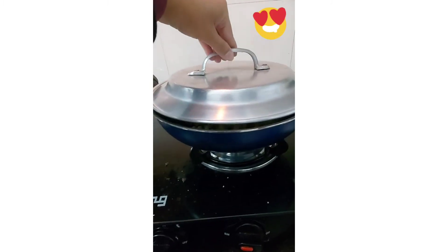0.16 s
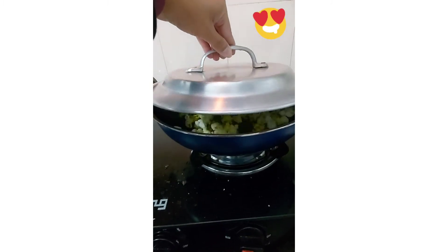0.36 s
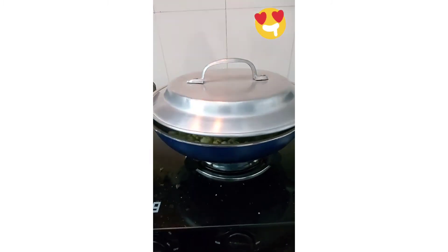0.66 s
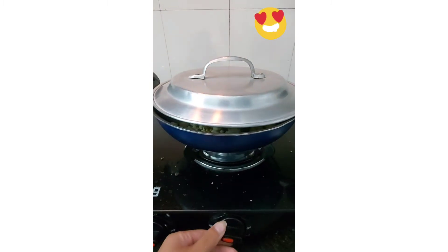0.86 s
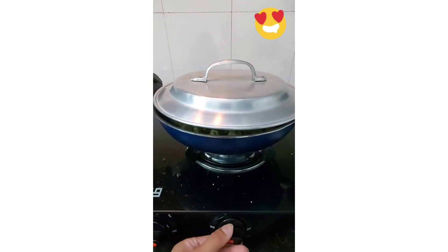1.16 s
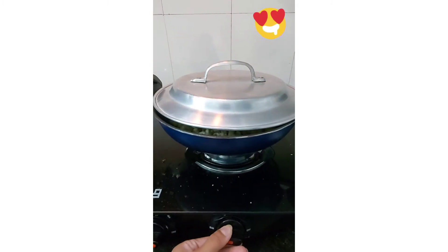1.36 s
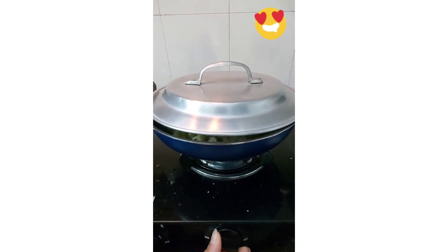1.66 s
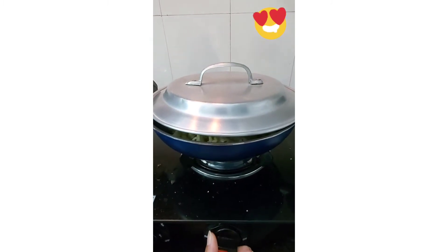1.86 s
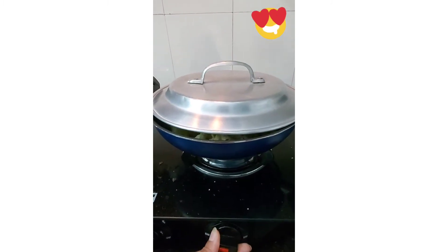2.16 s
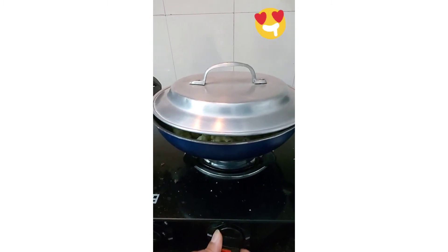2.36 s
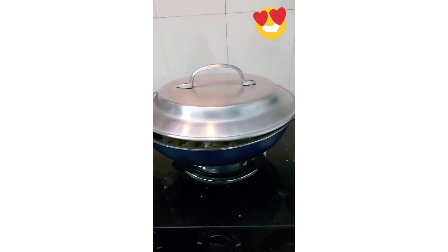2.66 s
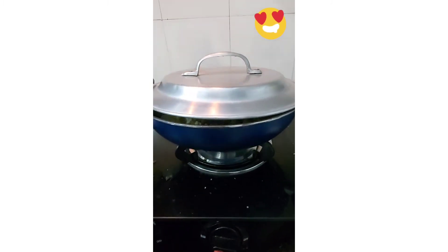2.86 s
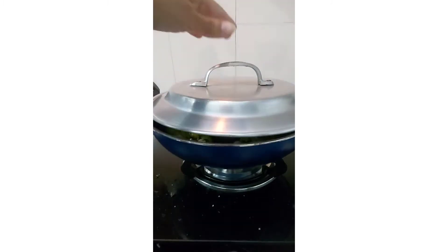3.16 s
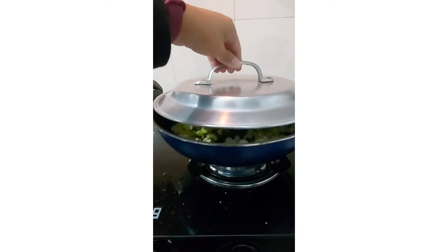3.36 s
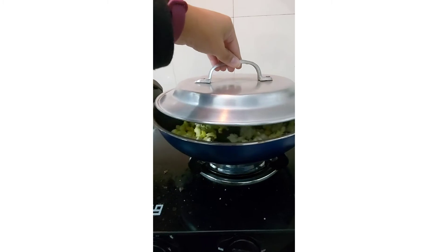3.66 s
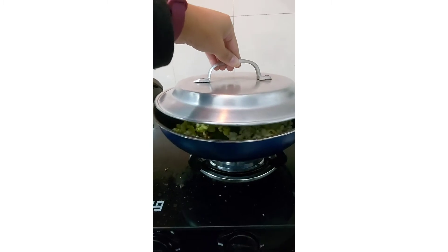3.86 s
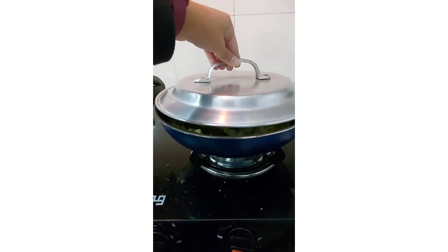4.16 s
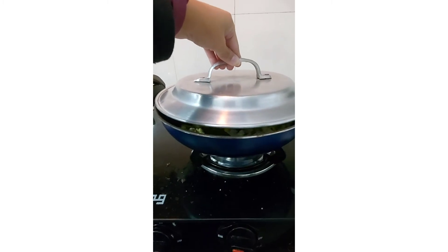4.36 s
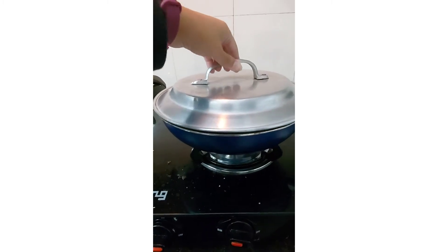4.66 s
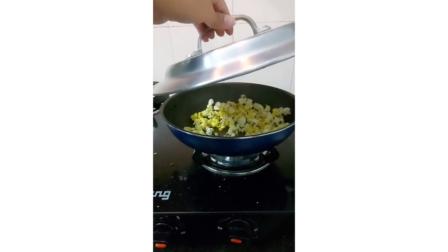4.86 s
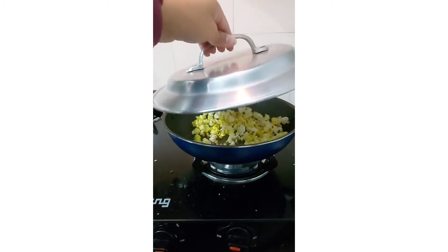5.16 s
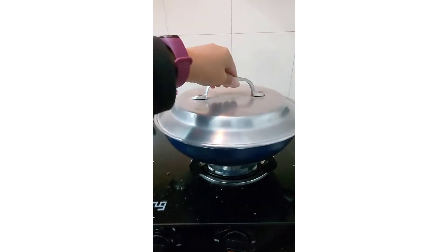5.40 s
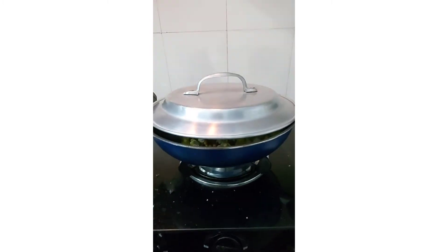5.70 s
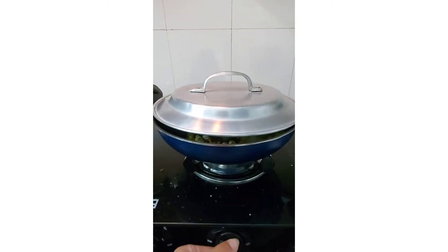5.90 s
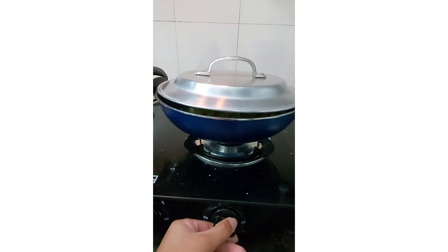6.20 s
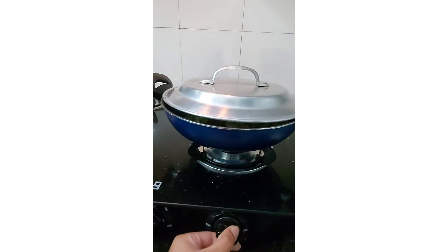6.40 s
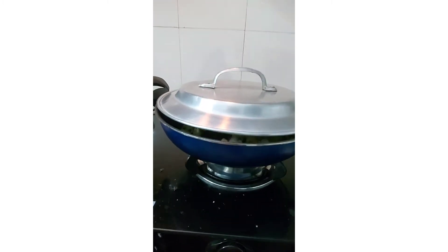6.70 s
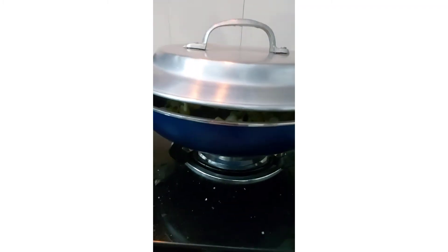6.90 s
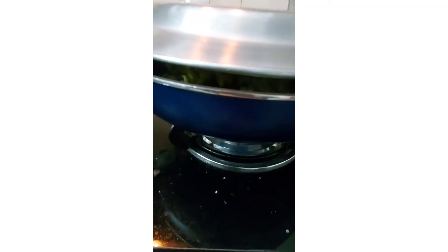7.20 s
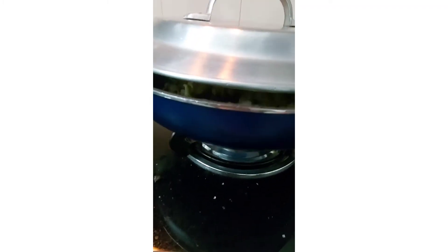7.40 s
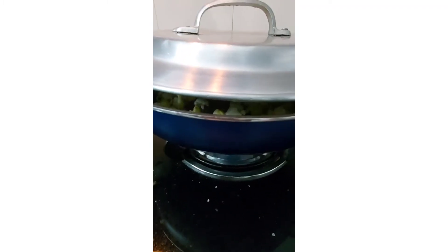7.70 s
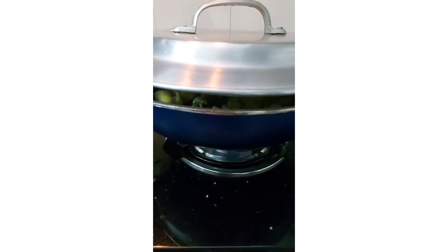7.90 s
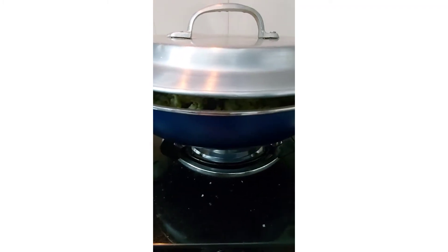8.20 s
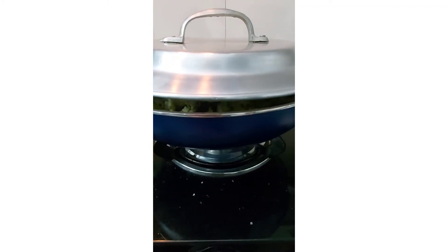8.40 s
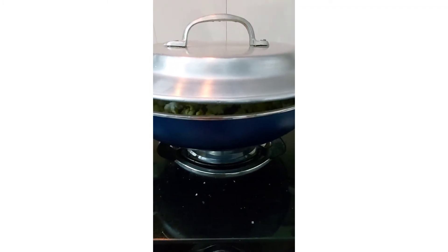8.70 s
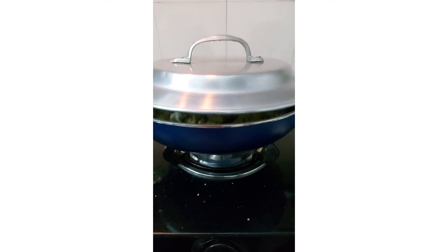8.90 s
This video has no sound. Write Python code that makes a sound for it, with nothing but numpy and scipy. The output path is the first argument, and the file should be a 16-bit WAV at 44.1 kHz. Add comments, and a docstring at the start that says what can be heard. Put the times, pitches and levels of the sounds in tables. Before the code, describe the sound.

Popcorn pops close by in a lidded metal pan on a kitchen gas stove. Each pop is a sharp crack with a hollow thump and a short metallic ring, and popped corn tumbles lightly in between. The pops come in quick, uneven clusters, then thin out. A faint burner hiss, tiny oil spits and a low street drone lie underneath, and a car horn sounds briefly outside at the end.

```python
"""Popcorn pops under a loose metal lid on a gas stove, close to a phone with two microphones.
Each pop thumps the air under the lid, rings the pan and cracks; popped corn tumbles in between.
Behind it the kitchen rumbles, the burner hisses and the street drones, louder as traffic draws near.
Oil spits, faint tones come and go, and at the end a car horn buzzes outside."""
import sys
import numpy as np
from scipy import signal
from scipy.io import wavfile
from scipy.ndimage import uniform_filter1d

SR = 44100
rng = np.random.default_rng(int(sys.argv[2]) if len(sys.argv) > 2 else 0)


def dump_mix(stems):
    """Bounce the given channels to the path in sys.argv[1] as a 16-bit WAV at rate SR."""
    frames = np.atleast_2d(stems).T  # one column per channel
    limited = np.clip(frames, -1, 1)  # hard clip at full scale
    pcm = np.round(limited * 32767).astype(np.int16)
    wavfile.write(sys.argv[1], SR, pcm)


N = 399100


def undb(db):
    return 10 ** (np.asarray(db) / 20)


def level(x, db):
    return x * undb(db) / np.sqrt(np.mean(x ** 2))


def crest(x, db, ms):
    """Scale a sound so that its loudest stretch, ms long, has this level."""
    power = uniform_filter1d(np.mean(x ** 2, axis=0), int(ms * SR / 1000))
    return x * undb(db) / np.sqrt(power.max())


def band(x, low_hz, high_hz):
    return signal.sosfilt(signal.butter(2, [low_hz, high_hz], "band", fs=SR, output="sos"), x)


def smooth(x, samples):
    return uniform_filter1d(uniform_filter1d(x, samples), samples)


def wander(per_s):
    """A smooth random wobble, mostly between -1 and 1."""
    hold = int(SR / per_s)
    return 1.3 * smooth(np.repeat(rng.standard_normal(N // hold + 1), hold), hold)[:N]


def curve(table):
    return np.interp(np.arange(N) / SR, *np.transpose(table))


def add(out, sound, start_s):
    at = int(start_s * SR)
    out[:, at:at + sound.shape[1]] += sound[:, :N - at]


def ring(tones, gain_db, phase):
    """One tap sets tones ringing; each drops 60 dB in its fade_s."""
    hz, db, fade_s = np.transpose(tones)
    waves = np.exp(np.outer(2j * np.pi * hz - np.log(1000) / fade_s, np.arange(3072) / SR))
    return np.imag((undb(db + gain_db) * np.exp(1j * phase)) @ waves)


def detune(tones, share):
    return np.array(tones) * (1 + share * rng.standard_normal((len(tones), 1)) * [1, 0, 0])


def drive(ringing, taps):
    return signal.fftconvolve(ringing, taps[None], axes=1)[:, :len(taps)]


# Natural tones of the air under the lid: pitch_hz, relative_db, fade_s
AIR_TONES = [(184.5, 0, 0.063), (306.4, -17.5, 0.65), (336.8, 1.5, 0.17), (392.9, 7.5, 0.093),
             (513, -5, 0.079)]
AIR_DETUNE = 0.044  # share of the pitch, from hit to hit

def air_thump(t, swell, fall, taps, air_hz):
    """The air under the lid gives a low thump that reaches both microphones nearly in step."""
    lag = np.array([[0], [.4]])
    tone = swell * undb(-10.5 * fall) * np.sin(2 * np.pi * air_hz * t + lag)
    air = ring(detune(AIR_TONES, AIR_DETUNE), rng.standard_normal(len(AIR_TONES)), lag)
    air = crest(drive(air, taps * swell * undb(-30 * fall)), -2.5, ms=6.8)
    return band(band(tone + air, 0.47 * air_hz, 1.29 * air_hz), 213, 770)


# Natural tones of the pan and lid: pitch_hz, relative_db, fade_s
PAN_TONES = [(651, -6, 0.11), (884, -1.5, 0.097), (1229, -8, 0.29), (1633, -9.5, 0.28), (1904, -3.5, 0.1),
             (2200, -0.5, 0.097), (2480, -5.5, 0.13), (2967, -4, 0.1), (3226, -5.5, 0.031),
             (3740, 3.5, 0.065), (4275, 3.5, 0.07), (4800, -6, 0.062), (5490, 3, 0.08)]

def pan_ring(t, swell, fall, taps, rise_ms, fall_ms, crack_over_ring_db, main_hz, second_hz):
    """Corn rings and rattles the metal; the spot it strikes brings out two tones."""
    pan_hz = np.array(PAN_TONES)[:, 0]
    nearby_db = 5.2 * np.exp(-(np.log(pan_hz / main_hz) / 0.3) ** 2)
    random_db = 3.5 * rng.standard_normal(len(pan_hz))
    # slow hits, and knocks with little crack, sound duller
    db_per_octave = -.25 * rise_ms + 0.51 * min(crack_over_ring_db - 4.5, 0)
    dull_db = db_per_octave * np.log2(pan_hz / 1800).clip(0)
    tones = detune(PAN_TONES, share=0.015)  # heat and corn shift the pitches
    metal = ring(tones, nearby_db + random_db + dull_db, 2 * np.pi * rng.random((2, len(tones))))
    lag = np.array([[0], [np.pi / 2]])  # the microphones hear the metal out of step
    metal += ring([(main_hz, 8, 0.089), (second_hz, 6.5, 0.089)], -.3 * rise_ms, lag * [1, -1])
    metal = crest(drive(metal, taps[1] * swell * undb(-18 * fall)), 0, ms=0.77)
    rattle = band(taps[1:] * swell * undb(-7 * fall), 960, 3660)
    rattle = crest(rattle, -5.5 + min(0.16 * rise_ms, 3), ms=1)
    # a sharp blow adds a clear ping
    sharpness = 1.31 * np.exp(-rise_ms / 7 - (fall_ms / 36) ** 2)
    ping = np.sin(2 * np.pi * main_hz * t + lag) + undb(-1.5) * np.sin(2 * np.pi * second_hz * t - lag)
    ping *= swell * undb(-6 * fall - 0.52 * np.maximum(1000 * t - rise_ms, 0))
    return metal + rattle + sharpness * ping


def hull_crack(t, swell, fall, cut_short, crack_db):
    """A gritty crack drops fast and trails off as steam; a loud one is a hull bursting at once."""
    grit = undb(2.77 * rng.exponential(size=len(t)))
    burst = np.clip((crack_db + 29) / 4, 0, 1)  # bursts begin above -29 dB
    attack = swell + burst * (1 - swell)
    fade = 0.4 * burst * np.exp(-t / 0.0036) + undb(-16 * fall) + 0.024 * undb(-4 * fall) * cut_short
    spray = rng.standard_normal((4, len(t))) * grit * attack * fade
    lower = np.array([[.9], [1.1]]) * band(spray[:2], 4160, 8270)
    upper = np.array([[1.1], [.45]]) * band(spray[2:], 8300, 13900)  # louder on the left
    return lower + upper


def corn_hit(air_hz, rise_ms, fall_ms, thump_db, ring_db, crack_db, main_hz, second_hz):
    """One pop or tumble: a swarm of tiny taps swells and dies, with a thump, a ring and a crack."""
    t = np.arange(6144) / SR
    ms = 1000 * t
    swell = np.clip(ms / rise_ms, 0, 1) ** 0.71
    fall = np.maximum(ms - rise_ms, 0) / max(fall_ms, 4)  # fading steps since the peak
    taps = rng.standard_normal((3, len(t))) * undb(2.2 * rng.exponential(size=(3, len(t))))
    # the ring is cut off quickly, leaving a faint tail
    cut_short = undb(-3 * fall ** 2) + 0.12 * np.exp(-ms / 50)
    thump = air_thump(t, swell, fall, taps[0], air_hz)
    thump = crest(thump * cut_short, thump_db, ms=12.9) * undb([[-.8], [.8]])
    metal = pan_ring(t, swell, fall, taps, rise_ms, fall_ms, crack_db - ring_db, main_hz, second_hz)
    crack = hull_crack(t, swell, fall, cut_short, crack_db)
    return thump + crest(metal * cut_short, ring_db, ms=5.2) + crest(crack, crack_db, ms=1.44)


def stove_shake(hz, db):
    """The stove top gives a short, deep shudder, stronger on the left."""
    t = np.arange(6000) / SR
    wave = np.array([[1.4], [.6]]) * np.sin(2 * np.pi * hz * t - np.array([[0], [1.2]]))
    return undb(db) * wave * np.exp(-t / 0.007) * np.clip(t * hz * 4, 0, 1)


def steam(db):
    """Steam hisses on after a crack."""
    t = np.arange(13000) / SR
    return undb(db) * band(rng.standard_normal((2, len(t))), 5500, 15500) * np.exp(-t / 0.13)


# Pops, knocks and tumbles of the corn (fall_ms is one step of fading):
# start_s, rise_ms, fall_ms, thump_db, ring_db, crack_db, main_pitch_hz, second_pitch_hz
CORN_HITS = [(0.006, 4.7, 24, -19.5, -30.5, -32, 3760, 810), (0.142, 15, 16, -24, -31, -40, 1830, 2320),
             (0.188, 15.2, 18, -32, -32.5, -40, 1580, 3300), (0.305, 3.6, 41, -33, -30, -37, 680, 910),
             (0.317, 3.5, 3.4, -17.5, -24, -17.5, 650, 1930),
             (0.372, 20.3, 11.8, -15, -19.5, -35, 1890, 1670),
             (0.448, 8.5, 14, -27, -27, -26.5, 2230, 3720), (0.488, 14.6, 60, -34, -30.5, -34, 2510, 925),
             (0.548, 2.9, 11, -35, -35.5, -38, 896, 2350), (0.581, 9.3, 38, -22.5, -29, -30, 1135, 830),
             (0.603, 1.1, 14, -30, -23, -20.5, 897, 4258), (0.616, 4.9, 12.6, -25, -28, -30, 903, 1660),
             (0.769, 6.2, 31, -32.5, -34.5, -49, 880, 1970), (0.802, 0.67, 19, -9, -25, -24.5, 640, 884),
             (0.862, 13.3, 18, -25.5, -25, -42, 1878, 2410),
             (0.9, 28.4, 16.2, -31, -27.5, -37.5, 880, 2995), (1.15, 1.4, 18, -24, -29, -19, 3950, 4300),
             (1.172, 3.9, 19.5, -29.5, -28, -64, 887, 1312), (1.3, 15, 23, -26.5, -37, -34.5, 3100, 5023),
             (1.371, 11, 31, -24, -34.5, -45, 890, 780), (1.419, 11.3, 20.4, -26.5, -31, -28.5, 2260, 4030),
             (1.462, 13.5, 22, -23.5, -28.5, -44, 1390, 896),
             (1.606, 7.3, 18.6, -18.5, -28, -28.5, 1110, 2560),
             (1.634, 8.9, 11, -55, -29.5, -50, 2050, 1386), (1.662, 1.8, 15, -16.5, -32, -25, 1210, 1820),
             (1.675, 1.9, 29, -33, -27, -51, 924, 2430), (1.909, 7.1, 43, -72, -44.5, -60, 2175, 2505),
             (2.07, 11.2, 28.4, -30.5, -25.5, -26.5, 3042, 880),
             (2.279, 12.2, 21, -30.5, -32, -43.5, 1280, 1520), (2.327, 9.8, 25, -47, -43, -50.5, 633, 3740),
             (2.38, 4.2, 21.5, -19.5, -26.5, -23, 820, 3600),
             (2.401, 8.6, 19.6, -34.5, -30.5, -60, 2110, 900),
             (2.518, 2.3, 21.4, -20.5, -24, -20, 833, 2200),
             (2.602, 7.8, 36.6, -24.5, -28, -43.5, 2010, 1553),
             (2.673, 2.6, 9.2, -29.5, -41.5, -50, 1550, 730),
             (2.836, 2.7, 44, -33.5, -30, -25.5, 3750, 2210),
             (2.869, 0.74, 15.3, -13, -14.5, -19, 2940, 3920),
             (3.037, 1.1, 6.5, -19.5, -24, -19, 2850, 3440),
             (3.05, 5.8, 13.5, -17.5, -26.5, -19.5, 3040, 2590),
             (3.067, 2.9, 5, -49, -27, -29.5, 3100, 910), (3.226, 23, 11, -30, -36, -43, 630, 1633),
             (3.322, 14, 19, -30, -28, -43, 1640, 2430), (3.496, 31, 7.4, -41.5, -49, -59, 890, 2180),
             (3.578, 15.8, 22, -32.5, -24.5, -28.5, 1950, 665),
             (3.646, 9.3, 37, -37.5, -39, -52, 634, 1280), (3.716, 17.8, 19, -41.5, -32, -30, 2976, 1620),
             (3.862, 8, 20, -66, -55.5, -58, 2540, 3320), (4.012, 8.1, 44, -54, -49, -78, 900, 2220),
             (4.091, 1.2, 30, -18, -26, -27, 2480, 4720), (4.099, 4.1, 14, -21.5, -15.5, -21.5, 2413, 1950),
             (4.423, 3.9, 11.6, -15.5, -23.5, -19, 3630, 2880), (4.443, 7.9, 17, -45, -30, -61, 2048, 1560),
             (4.511, 4.3, 23, -35, -34, -38, 1986, 1610), (4.653, 78, 8.4, -48, -53.5, -44.5, 885, 1880),
             (5.015, 23.4, 13, -45.5, -35, -32.5, 3170, 2010),
             (5.259, 3.6, 11, -19.5, -21.5, -31, 1830, 526), (5.285, 3.9, 9, -17, -24.5, -70, 1800, 1210),
             (5.287, 2, 14, -34, -19, -70, 525, 650), (5.351, 18, 45, -30, -40, -50, 640, 2190),
             (5.391, 3.5, 39, -30, -36, -75, 1365, 2020), (5.42, 32, 11, -34.5, -47.5, -49, 2680, 2090),
             (5.623, 11, 57, -74, -39, -59, 2660, 2270), (5.813, 7.3, 16.5, -15, -20, -23, 884, 2170),
             (5.941, 5.4, 5.5, -38.5, -41, -40, 780, 2190), (6.158, 10, 23.4, -30, -35, -39, 1205, 1910),
             (6.205, 1.9, 32, -20, -30, -30.5, 1950, 2700), (6.306, 1.8, 13.4, -14.5, -24, -19, 2545, 4220),
             (6.322, 0.91, 19, -33, -32, -54, 1944, 1240),
             (6.632, 0.45, 15.2, -18.5, -16.5, -11.5, 2206, 2930),
             (7.004, 0.37, 12, -22, -20, -15.5, 2215, 2990), (7.247, 25.5, 3.7, -37, -26.5, -36, 920, 2380),
             (7.259, 4.8, 5.6, -17.5, -23.5, -20.5, 830, 4790),
             (7.274, 0.84, 24, -52, -27.5, -76, 1230, 1930), (7.456, 17, 17, -45.5, -52, -52, 684, 3070),
             (7.835, 2, 25, -24, -33, -31.5, 2960, 2070),
             (7.872, 10.5, 38.4, -34.5, -31, -32.5, 1240, 4312),
             (8.488, 1.5, 17.6, -23.5, -27, -19, 1233, 2990), (8.506, 1.8, 30, -34, -29, -43, 1750, 1336),
             (8.554, 7.3, 14.6, -18.5, -18, -35.5, 1732, 875)]
# The thump, tuned by the gap under the lid and the heap of corn: time_s, pitch_hz
THUMP_PITCH = [(0, 376.5), (3.2, 356.7), (3.35, 468), (4.15, 428), (4.4, 356.3), (5.0, 505), (5.26, 474),
               (5.3, 378), (5.8, 380), (7.0, 360), (7.3, 343), (7.85, 322), (8.5, 361)]

def popcorn():
    """Each hit sounds in the pan, shakes the stove a little and leaves a wisp of steam."""
    out = np.zeros((2, N))
    for start_s, *hit in CORN_HITS:
        rise_ms, _, thump_db, _, crack_db, _, _ = hit
        air_shift, shake_shift = rng.standard_normal(2)
        air_hz = np.interp(start_s, *np.transpose(THUMP_PITCH)) * (1 + AIR_DETUNE * air_shift)
        add(out, corn_hit(air_hz, *hit), start_s)
        shake = stove_shake(hz=110 * np.exp(0.27 * shake_shift), db=min(thump_db, -15) - 8.5)
        add(out, shake, start_s + rise_ms / 2000)
        add(out, steam(crack_db - 44.5), start_s + rise_ms / 1000)
    return out


def wall_echo(sound, fade_s=0.12, echo_db=-13):
    """Tiled walls answer with a short echo, different at each microphone."""
    t = np.arange(12000) / SR
    tail = rng.standard_normal((2, len(t))) * undb(-60 * t / fade_s) * np.clip(t / 0.0038, 0, 1)
    tail /= np.sqrt(np.sum(tail ** 2, axis=1, keepdims=True))
    return undb(echo_db) * signal.fftconvolve(sound, tail, axes=1)[:, :N]


def flickering_noise(shape, flicker_db, alike_hz):
    """Narrow noise bands each flicker on their own; below alike_hz, left and right grow alike."""
    hz, db = np.transpose(shape)
    out = 0
    for band_hz in np.exp(np.arange(np.log(hz[0]), np.log(hz[-1]), np.log(2) / 2.5)):
        shared, side = band(rng.standard_normal((2, N)), band_hz / 1.218, band_hz * 1.061)
        apart = np.clip((band_hz / alike_hz) ** 2, .2, 1)
        gain = undb(np.interp(np.log(band_hz), np.log(hz), db) + flicker_db * wander(24))
        out += gain * np.array([shared + apart * side, shared - apart * side]) / np.sqrt(1 + apart ** 2)
    return level(out, 0)


# Strength of the kitchen rumble from low to high: pitch_hz, relative_db
RUMBLE_SHAPE = [(190, -9), (230, -19.5), (310, 3.5), (400, -17.5), (900, -12.5), (1600, -35), (3000, -62)]

def kitchen_rumble():
    """The room rumbles softly throughout."""
    return undb(-51.5) * flickering_noise(RUMBLE_SHAPE, flicker_db=4, alike_hz=740)


# Strength of the gas hiss from low to high: pitch_hz, relative_db
HISS_SHAPE = [(1500, 19.5), (3000, 16), (6500, 8), (9500, 7.5), (12500, 16.5), (15500, 4.5)]
# Loudness of the burner: time_s, level_db
BURNER_LEVEL = [(0, -58.5), (1.1, -63), (3.1, -63), (3.3, -54), (3.75, -55.5), (3.9, -61), (4.6, -59),
                (4.72, -56), (4.9, -57), (5.25, -55.5), (5.33, -47.5), (5.47, -55), (5.52, -62.5),
                (6.8, -63), (8.4, -58), (9.05, -66)]

def burner_hiss():
    """The gas flame hisses and flares a little."""
    hiss = flickering_noise(HISS_SHAPE, flicker_db=3, alike_hz=700)
    return hiss * undb(curve(BURNER_LEVEL) + 0.89 * wander(8.1))


# Strength of the street drone from low to high: pitch_hz, relative_db
DRONE_SHAPE = [(22, -40), (60, -3.5), (90, -8), (130, -4), (185, -6.5)]

def street_drone(far_db=-58, near_db=-51.5, near_s=5.7, rise_s=0.14):
    """A deep drone steps up as traffic draws near."""
    level_db = curve([(near_s, far_db), (near_s + rise_s, near_db)])
    return undb(level_db) * flickering_noise(DRONE_SHAPE, flicker_db=4.5, alike_hz=314)


# The louder spits of oil: start_s, level_db
OIL_SPITS = [(0.65, -45), (4.2398, -46), (5.485, -52), (6.1673, -31.5)]

def oil_spits(faint_per_s=3):
    """Drops of oil burst in tiny bright ticks, with fainter ones at random moments."""
    out = np.zeros((2, N))
    t = np.arange(1500) / SR
    chance = rng.random((int(faint_per_s * N / SR), 2))
    faint = [(when * N / SR, -63 + 8 * size ** 2) for when, size in chance]
    for start_s, db in list(OIL_SPITS) + faint:
        tick = band(rng.standard_normal((2, len(t))) * np.exp(-t / 0.0048), 6800, 12000)
        add(out, crest(tick, db, ms=2.5), start_s)
    return out


# Brief tones between the pops: start_s, pitch_hz, length_ms, level_db
SOFT_TONES = [(3.321, 1570, 85, -56.5), (4.918, 1230, 67, -48), (7.55, 1414, 53, -54.5),
              (8.255, 1200, 57, -51), (8.295, 1760, 63, -49), (8.387, 1535, 48, -41.5)]

def soft_tones(faint_per_s=5.5):
    """Short, unsteady tones swell and fade, with fainter ones at random moments."""
    out = np.zeros((2, N))
    chance = rng.random((int(faint_per_s * N / SR), 3))
    faint = [(when * N / SR, 830 * 2 ** (1.2 * high), 46, -63.5 + 9 * size - 6 * high)
             for when, high, size in chance]
    for start_s, hz, ms, db in list(SOFT_TONES) + faint:
        length = int(ms * SR / 1000)
        tone = band(rng.standard_normal((2, 4410)), hz - 75, hz + 75)[:, -length:]
        add(out, level(tone, db) * np.sin(np.pi * np.arange(length) / length), start_s)
    return out


# Jolts of the stove top: start_s, pitch_hz, level_db
STOVE_JOLTS = [(2.075, 56, -21), (7.004, 73, -15)]

def stove_jolts():
    """The hardest jolts shake the stove top with a deep thud."""
    out = np.zeros((2, N))
    for start_s, hz, db in STOVE_JOLTS:
        add(out, stove_shake(hz, db), start_s)
    return out


# The horn's strongest overtone throbs as echoes arrive: time_s, level_db
HORN_THROB = [(8.75, -36.5), (8.786, -26.5), (8.798, -42), (8.818, -26.5), (8.87, -39), (8.888, -32.5),
              (8.928, -40.5), (8.962, -22.5), (8.99, -41), (9.01, -31), (9.05, -31.5)]
# The horn's overtones, at 2 to 14 times its pitch: relative_db
HORN_OVERTONES = [-33, -32, -26, -37, -30, -17, -6.5, 1, -5, -14, -25, -26, -30]

def car_horn(start_s=8.71, pitch_hz=320.2, sag_hz_per_s=12, rise_s=0.07, average_db=-34.5):
    """A metal disc buzzes off to the right on a sagging pitch; echoes make each overtone waver."""
    start = int(start_s * SR)
    t = np.arange(N - start) / SR
    phase = 2 * np.pi * (pitch_hz * t - sag_hz_per_s * t ** 2 / 2)
    # the horn's moving parts clatter, adding faint high overtones
    clatter = [(k, -34 + 3.5 * np.cos((k - 20) / 2)) for k in range(15, 46)]
    throb_db = smooth(curve(HORN_THROB), 300)[start:] - average_db
    sides = np.array([[.5], [-.5]])  # left, right
    buzz = np.zeros((2, len(t)))
    for k, tone_db in list(enumerate(HORN_OVERTONES, start=2)) + clatter:
        level_waver, phase_waver = 29 * smooth(rng.standard_normal((2, 2, len(t))), 700)
        db = average_db + tone_db + throb_db * np.exp(-((k - 9) / 1.9) ** 2)  # throbs most at k = 9
        side_db = -5.5 * sides * np.tanh((24 - k) / 8)  # the highest tones lean left instead
        gain = undb(db + side_db + (2.6 + .05 * k) * level_waver)
        left_lead = -1.7 + np.pi * (k % 2 == 0)
        shift = (.25 + .025 * k) * phase_waver + left_lead * sides + 2 * np.pi * rng.random()
        buzz += gain * np.sin(k * phase + shift)
    buzz *= np.clip((t - 0.01) / rise_s, 0, 1) ** 2  # starts just after the lowest tone
    low_gain = np.sqrt(2) * undb(-40.5 + 2.5 * wander(45)[start:] - 4.2 * sides)
    low_tone = low_gain * np.sin(phase + .4 * wander(40)[start:])
    rolling_car = level(band(rng.standard_normal((2, len(t))), 340, 1300), -53)
    horn = (buzz + low_tone + rolling_car) * np.clip(t / rise_s, 0, 1)
    return np.pad(horn, ((0, 0), (start, 0)))


def scene():
    corn = popcorn() + stove_jolts()
    brief_sounds = corn + wall_echo(corn) + oil_spits() + soft_tones()
    return brief_sounds + kitchen_rumble() + burner_hiss() + street_drone() + car_horn()


def record(dry):
    """The phone rounds the loudest peaks, thins the deepest bass and cuts the highest treble."""
    rounded = np.tanh(dry * .8) / .8
    thinned = signal.sosfilt(signal.butter(2, 32, "high", fs=SR, output="sos"), rounded)
    return signal.sosfilt(signal.ellip(8, .2, 70, 16000, fs=SR, output="sos"), thinned)


dry = scene()
out = record(dry)
dump_mix(out)
```